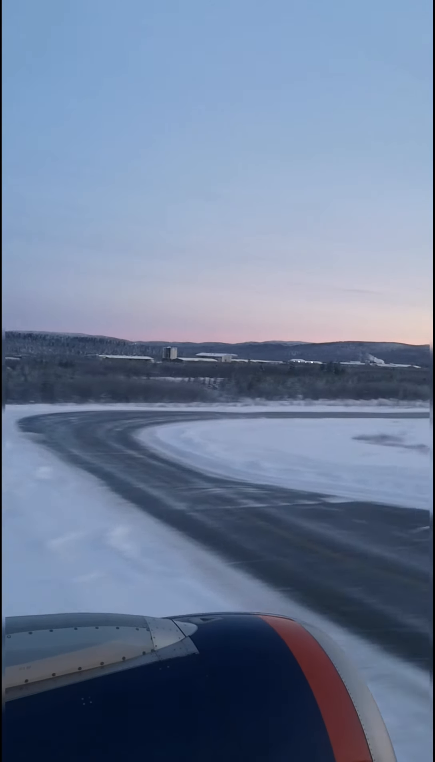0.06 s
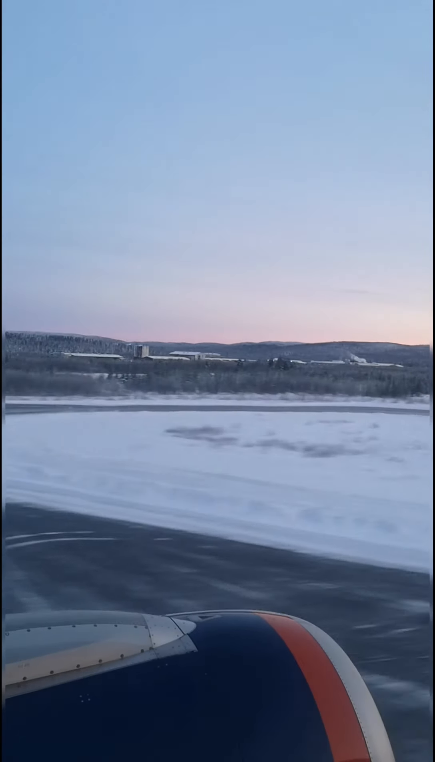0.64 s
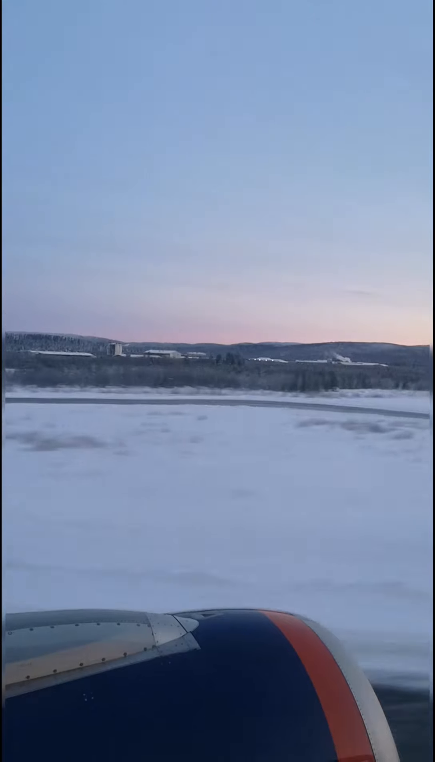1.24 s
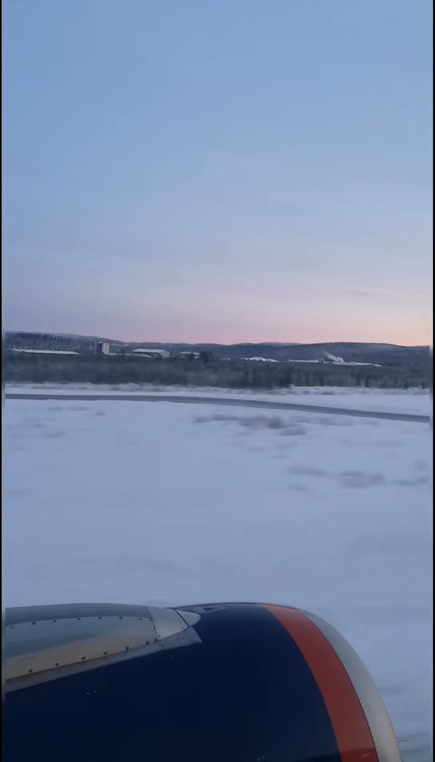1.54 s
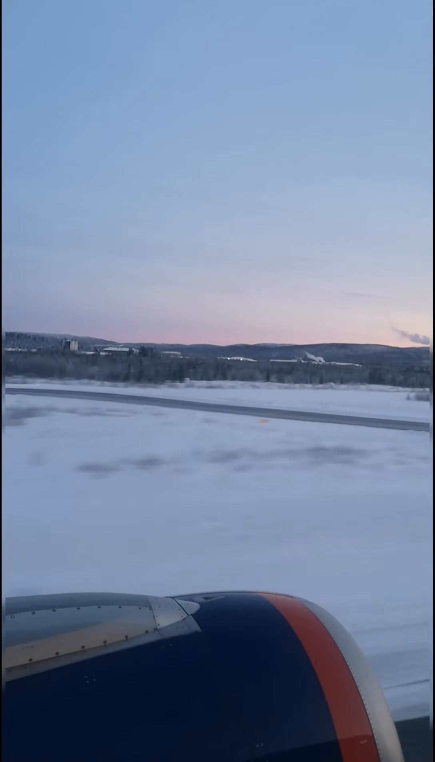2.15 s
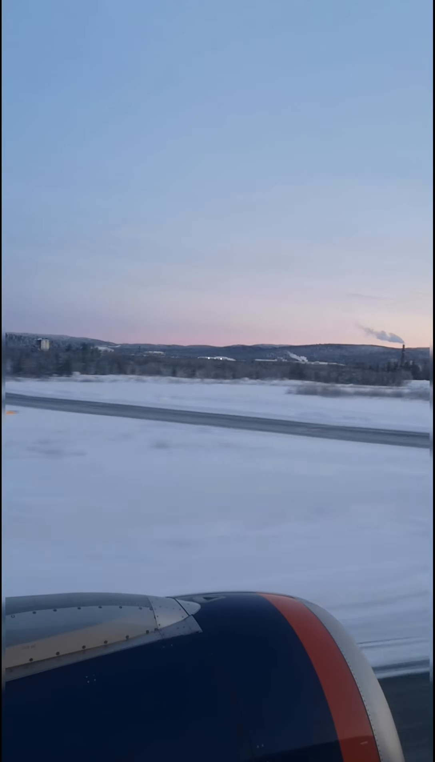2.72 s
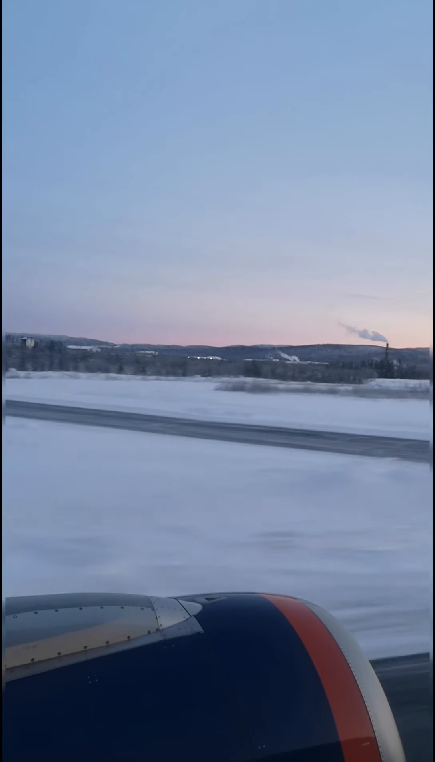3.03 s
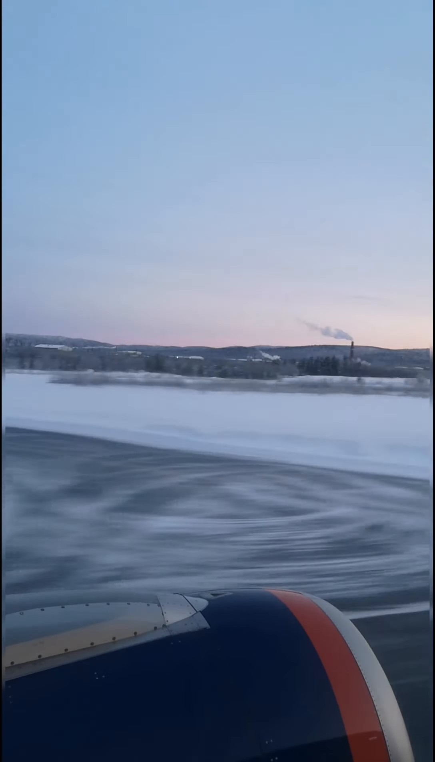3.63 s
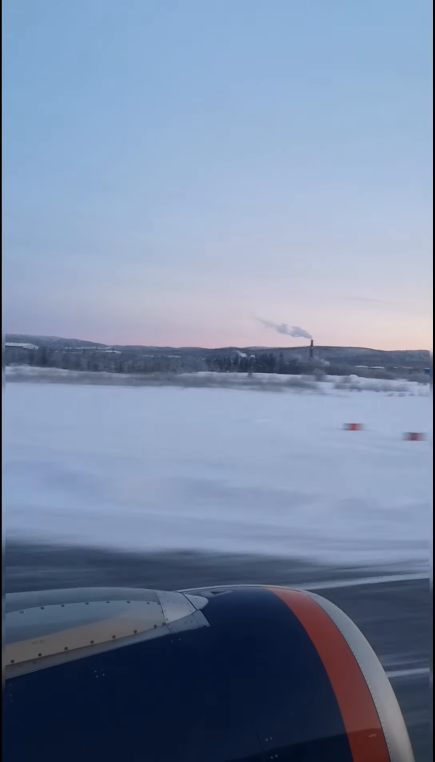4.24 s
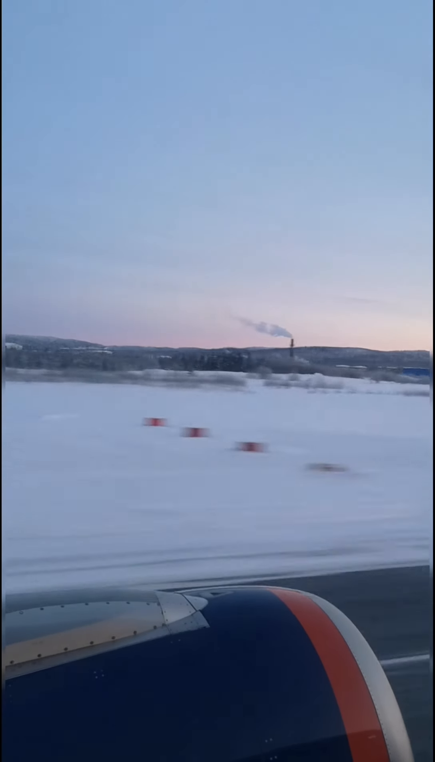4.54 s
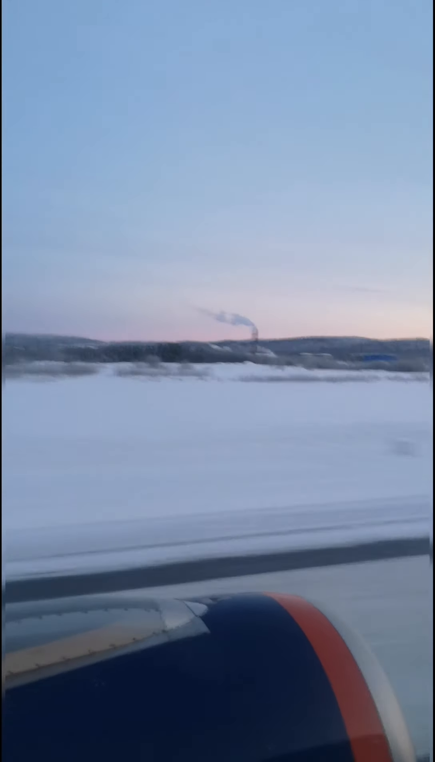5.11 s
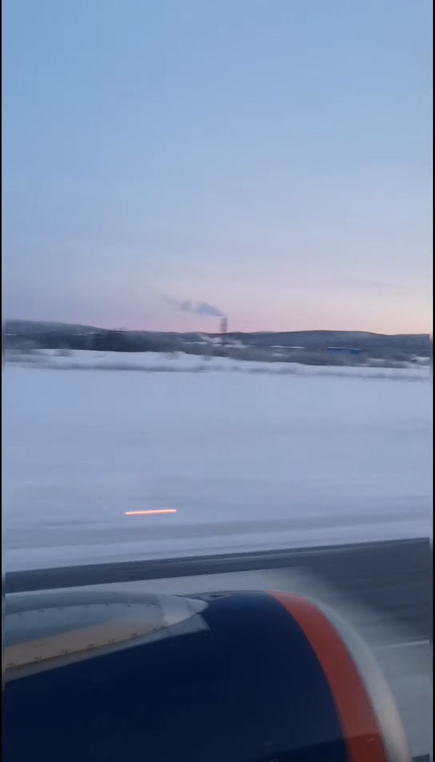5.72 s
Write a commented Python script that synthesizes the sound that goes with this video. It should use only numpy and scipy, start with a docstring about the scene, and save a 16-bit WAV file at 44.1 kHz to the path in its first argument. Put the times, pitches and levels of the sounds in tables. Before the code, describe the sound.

A jet engine drones inside a rolling airliner with rushing ventilation, then the wheels thud over rough ground and plastic trim rattles.

```python
"""Inside an airliner rolling on a winter airfield, stereo microphone at a window seat beside the engine.
The jet drones through the wall, its fan tone sinks as it spools down, and the ventilation rushes
and whines all around. After four seconds the wheels reach rough ground: the floor thuds, the plastic
trim ticks and rustles, and each heavy bump makes the recorder's gain control duck the whole cabin."""
import sys
import numpy as np
from scipy import signal
from scipy.fft import rfft, irfft, next_fast_len
from scipy.io import wavfile
from scipy.ndimage import uniform_filter1d, minimum_filter1d, map_coordinates

SR = 44100
rng = np.random.default_rng(int(sys.argv[2]) if len(sys.argv) > 2 else 0)


def store_wav(level_fs):
    """Save 16-bit WAV to argv[1]."""
    pcm = np.round(np.clip(np.atleast_2d(level_fs), -1, 1) * 32767)
    wavfile.write(sys.argv[1], SR, pcm.T.astype(np.int16))


N = 263277
TIME = np.arange(N) / SR


# The jet's drone through the wall, and the noise that comes with thrust.
# Each row: frequency in Hz, relative spectral level in dB.
DRONE_SPECTRUM = [(50, -25.5), (76, -3), (115, 1.5), (160, -0.5), (187, 1.5), (215, -11.5), (245, -11.5),
                  (295, -14.5), (340, -17), (410, -22), (480, -29), (560, -39.5), (2000, -130)]
THRUST_SPECTRUM = [(120, -42), (240, 1), (265, -3.5), (295, 1), (345, -8.5), (450, -19.5), (700, -46.5),
                   (2200, -38), (2700, -33), (3150, -44), (3800, -43), (12000, -100)]
# The fan's blade tone and its octave at the seat. Each row: time in seconds, level in dB.
BLADE_LEVELS = [(0, -37), (.6, -44.5), (1.0, -35), (1.45, -36), (1.7, -45), (2.8, -35), (3.15, -47),
                (3.3, -31.5), (3.7, -30.5), (3.88, -40), (4.1, -30), (4.4, -36.5), (4.8, -31.5), (5.3, -42),
                (5.65, -44.5), (5.85, -32.5)]
OCTAVE_LEVELS = [(0, -63.5), (1.8, -56.5), (2.05, -48), (2.5, -57.5), (3.0, -53), (3.5, -57), (3.7, -51),
                 (3.9, -55), (4.17, -44.5), (4.4, -51.5), (4.72, -52), (4.88, -64)]

def engine(throttle, taxi_hz=455, idle_hz=416):
    """Just beyond the wall, the jet's roar darkens and its blade tone sinks as the fan slows."""
    roar = amp(-18) * rush(DRONE_SPECTRUM, even=.65, span_s=.12)
    roar += amp(-33.5) * throttle * rush(THRUST_SPECTRUM, even=.51, span_s=.091)
    fan_hz = idle_hz + (taxi_hz - idle_hz) * throttle
    phase = 2 * np.pi * np.cumsum(fan_hz * (1 + .002 * wobble(25))) / SR
    stereo_phase = phase + np.array([[.2], [-.2]])
    blade = amp(curve(BLADE_LEVELS) + 1.3 * wobble(9)) * np.sin(stereo_phase)
    octave_db = curve(OCTAVE_LEVELS) + 1.5 * np.array([wobble(9), wobble(9)])
    return roar + blade + amp(octave_db) * np.sin(2 * phase)


def spool_down(start_s=2.75, length_s=2.85):
    """The throttle eases from 1 at taxi power to 0 at idle, quickly at first."""
    return np.clip(1 - (TIME - start_s) / length_s, 0, 1) ** 1.5


# The fuselage rumbling on smooth ground and juddering on rough.
# Each row: frequency in Hz, relative spectral level in dB.
ROLL_SPECTRUM = [(6, -23), (14, 1.5), (22, -3.5), (32, -3), (45, 8), (56, 1.5), (70, -8), (95, -5),
                 (125, -20.5), (200, -26.5), (400, -74.5), (1200, -140)]
JUDDER_SPECTRUM = [(6, -21), (14, -7), (22, -1), (32, -6), (44, 2.5), (54, 3.5), (68, -6), (85, -13),
                   (97, -12), (110, -21), (140, -27), (170, -23), (184, -19.5), (203, -38), (400, -70),
                   (1200, -140)]
# Bumps under the wheels, and two jolts that set the cabin booming.
# Each row: peak time in seconds, level in dB, decay in seconds.
WHEEL_BUMPS = [(.6, -12.5, .035), (.91, -8, 0.013), (1.25, -10, 0.019), (1.64, -15.5, .016),
               (2.03, -16, 0.055), (2.92, -13.5, .11), (3.5, -13.5, .047), (3.9, -12, .1), (4.34, -6, .05),
               (4.395, -5.5, 0.061), (4.82, -5.5, 0.08), (4.91, -6.5, 0.068), (5.07, -1, 0.13),
               (5.125, -1, 0.11), (5.26, -1, .08), (5.39, -5.5, .04), (5.43, -3.5, .035), (5.54, 3, 0.11),
               (5.645, -1.5, 0.065), (5.73, -4, .04), (5.81, -2.5, .04), (5.87, -4, 0.05)]
CABIN_BOOMS = [(4.76, -21, 0.22), (5.79, -16.5, 0.23)]

def wheels(smooth_db=-21, rough_db=-13, rough_from_s=4.13, onset_s=.18):
    """From below, the undercarriage shakes the fuselage; bumps also reach its hollow resonances."""
    rough = np.clip((TIME - rough_from_s) / onset_s, 0, 1)
    ground = amp(smooth_db + (rough_db - smooth_db) * rough + 3.5 * wobble(16))
    bumps = swells(WHEEL_BUMPS, rise_s=.022)
    roll = np.sqrt(1 - rough) * rush(ROLL_SPECTRUM, even=.91, span_s=.057)
    judder = np.sqrt(rough) * rush(JUDDER_SPECTRUM, even=.88, span_s=.038)
    booms = amp(-19) * bumps + swells(CABIN_BOOMS, rise_s=.068)
    hollow = booms * rush(DRONE_SPECTRUM, even=.6, span_s=.087)
    return np.hypot(ground, bumps) * (roll + judder) + hollow


# Landing gear jolts, under the microphone.
# Each row: peak time in seconds, level in dB, pitch in Hz, decay in seconds.
GEAR_JOLTS = [(4.42, -15, 78, .04), (4.85, -12, 102, .025), (4.945, -6.5, 97, .03),
              (5.035, -8.5, 100, 0.025), (5.09, -8.5, 72, .04), (5.18, -3, 95, .025), (5.23, -9, 104, .02),
              (5.275, -6, 84, 0.028), (5.305, -7, 101, .03), (5.67, -10.5, 80, 0.055),
              (5.86, -7.5, 88, .025)]

def floor_thuds():
    """Each sharp jolt rings the cabin floor for a few cycles."""
    wavering_time = np.cumsum(1 + .04 * wobble(40)) / SR
    out = np.zeros(N)
    for s, db, hz, decay_s in GEAR_JOLTS:
        phase = 2 * np.pi * hz * wavering_time + rng.uniform(0, 2 * np.pi)
        out += swells([(s, db, decay_s)], rise_s=.013) * np.sin(phase)
    return out


# Duct air all around the seat. Each row: frequency in Hz, relative spectral level in dB.
AIR_SPECTRUM = [(280, -25.5), (480, 7), (680, -.5), (800, 0), (1000, 4), (1170, -2), (1900, 0.5),
                (2270, -2), (2450, -3), (2700, -5.5), (3300, -12.5), (4100, -17.5), (4550, -16),
                (5000, -20), (5500, -20.5), (6300, -24.5), (7000, -21.5), (7800, -23), (8400, -27.5),
                (9150, -22), (9750, -29.5), (11500, -35.5), (15000, -45)]
# Ventilation fans and duct resonances.
# Each row: pitch in Hz, bandwidth in Hz, relative level in dB, side over mid in dB.
DUCT_WHINES = [(812, 36, -9.5, 9), (935, 70, -13, -9), (1060, 24, -13, 5), (1562, 18, -17.5, -1),
               (2009, 30, -10.5, -3), (2060, 130, -10.5, 2), (2545, 36, -14, -3), (2575, 130, -13, 3),
               (2985, 70, -24, 0), (3122, 50, -21.5, 2), (3489, 45, -27, -6), (3660, 80, -29, -12),
               (6900, 200, -35, 0)]

def ventilation(throttle, whine_idle_db=-47.25, taxi_boost_db=4.5):
    """Air rushes from the ducts; their fans' fuzzy whines weaken as the engine's air supply eases."""
    air = amp(-42.5 + .51 * wobble(14)) * rush(AIR_SPECTRUM, even=.26, span_s=.059)
    whines = np.zeros((2, N))
    for hz, width_hz, db, side_db in DUCT_WHINES:
        mid, side = ring(flutter(width_hz), hz) * amp([[0], [side_db]])
        whines += amp(db) * unit(np.array([mid + side, mid - side]))
    return air + amp(whine_idle_db + taxi_boost_db * throttle) * whines


# A panel's bright tick and dull knock. Each row: frequency in Hz, relative spectral level in dB.
TICK_SPECTRUM = [(500, -62), (3000, -22), (4500, -8.5), (5700, -3.5), (6700, -7), (7700, -2), (8700, -6),
                 (9600, -5), (11000, -19), (15000, -26.5)]
KNOCK_SPECTRUM = [(150, -45.5), (950, -1.5), (1400, -2), (2000, -5.5), (2700, -3), (3400, -13.5),
                  (8000, -36), (15000, -63)]
# Trim panels snapping in their seats. Each row: start in seconds, relative level in dB,
# knock over tick in dB, seconds to fall 60 dB, ring pitch in Hz, ring over knock in dB,
# tick pan and knock pan in dB to the right.
PANEL_SNAPS = [(4.796, -49.5, 19.5, .028, 1950, 0, 0.5, 2), (4.85, -46.5, -15, .014, 2000, 0, -3.5, 0),
               (4.865, -47, -15, .015, 2000, 0, 4.5, 0), (4.882, -50, -13, .03, 2000, 0, -2.5, 0),
               (4.905, -48.5, -10, .015, 2000, 0, 0.5, 0), (4.919, -45.5, -13, .044, 2000, 0, 0.5, 0),
               (5.021, -53, -6, 0.028, 2000, 0, -1, 0), (5.162, -29.5, -19, .01, 2000, 1, 5, 2),
               (5.201, -47.5, -12, .064, 2000, 0, -0.5, 0), (5.321, -38.5, -7, .025, 2000, 0, 1.5, 0),
               (5.493, -49.5, -2, .052, 2010, 0, 1.5, 2), (5.639, -46.5, 0, .076, 2020, 0, 1.5, 1),
               (5.735, -49, -3, .028, 2000, 1, 0, -1), (5.892, -36.5, 11.5, .044, 1040, -2, 4, -3.5),
               (5.907, -45, 4, .06, 1037, -1, 4, -1), (5.927, -42.5, 3, .1, 1104, -3, 3, -1)]

def panel_ticks():
    """A panel slips: a quick tick over the duller knock of its shell, which rings at its own pitch."""
    bright = diffuse(rng.standard_normal((2, N)), TICK_SPECTRUM)
    dull = diffuse(rng.standard_normal((2, N)), KNOCK_SPECTRUM)
    shell = flutter(width_hz=460)
    out = np.zeros((2, N))
    for s, db, knock_db, t60, ring_hz, ring_db, tick_pan, knock_pan in PANEL_SNAPS:
        age = np.maximum(TIME - s, 0)
        attack = 1 - np.exp(-age / (.071 * t60))  # longer slips start softer
        burst = attack * amp(db + 3 - 60 * age / t60)
        knock = dull + amp(ring_db) * ring(shell, ring_hz)
        out += burst * (bright * pan(tick_pan) + amp(knock_db) * knock * pan(knock_pan))
    return out


# Grains of chafing plastic, and soft swishes. Each row: frequency in Hz, relative spectral level in dB.
GRAIN_SPECTRUM = [(2000, -48), (4500, -0.5), (6000, -2.5), (9300, -1.5), (10500, -8), (12000, -15),
                  (15000, -20)]
SWISH_SPECTRUM = [(4000, -41.5), (7500, -4), (8600, -7.5), (9400, 2), (10200, -14), (11500, -32)]
# Loose trim chafing. Each row: peak time in seconds, relative level in dB, decay in seconds, pitch in Hz.
TRIM_CHAFES = [(4.81, -59.5, .18, 8400), (4.91, -58.5, .08, 5800), (4.94, -60, .12, 9500),
               (5.02, -62.5, .12, 8500), (5.14, -55, .16, 8000), (5.21, -56, .12, 6200),
               (5.28, -56.5, .2, 8000), (5.48, -61, .22, 7750), (5.66, -60, .4, 5400)]
# High swishes on the smooth ground. Each row: peak time in seconds, relative level in dB, decay in seconds.
SOFT_SWISHES = [(.5, -70, 0.044), (.8, -70, 0.056), (3.225, -61, .06)]

def trim_rustle(grains_per_s=4500, rise_s=.05):
    """Right of the microphone, shaken trim chafes in clumps of tiny grains, each part at its own pitch."""
    sizes = amp(1.4 * np.minimum(rng.exponential(size=N), 4))
    sizes *= rng.random(N) < grains_per_s / SR
    grains = diffuse(sizes * rng.standard_normal((2, N)), GRAIN_SPECTRUM)
    part = flutter(width_hz=900)
    strokes = [swells([row[:3]], rise_s) for row in TRIM_CHAFES]
    rings = sum(stroke * ring(part, hz) for stroke, (*_, hz) in zip(strokes, TRIM_CHAFES))
    clumps = amp(1.2 * wobble(70))
    chafing = (np.linalg.norm(strokes, axis=0) * grains + amp(-5) * rings) * clumps
    swish = swells(SOFT_SWISHES, rise_s) * diffuse(rng.standard_normal((2, N)), SWISH_SPECTRUM)
    return (chafing + swish) * amp([[-4], [2]])


# A strained panel rubbing in its frame. Each row: peak time in seconds, level in dB, decay in seconds.
PANEL_RUBS = [(4.77, -48, .03), (4.93, -50, .08), (5.0, -47, 0.046), (5.065, -45, .015)]

def panel_rub():
    """Friction drives one fuzzy resonance of a panel as the cabin flexes."""
    return swells(PANEL_RUBS, rise_s=.025) * ring(flutter(width_hz=130), hz=1000)


# Plastic edges squeaking. Each row: peak time in seconds, level in dB, half length in seconds,
# pitch in Hz, octave over fundamental in dB, pan in dB to the right.
EDGE_SQUEAKS = [(.48, -66, .02, 6350, -20, 2.5), (5.378, -63, .014, 10780, -30, 3),
                (5.837, -56, .021, 4850, -6, 3)]

def edge_squeaks():
    """Two plastic edges stick and slip for a moment: a tiny wavering tone and its octave."""
    wavering_time = np.cumsum(1 + .012 * wobble(160)) / SR
    out = np.zeros((2, N))
    for s, db, half_s, hz, octave_db, pan_db in EDGE_SQUEAKS:
        phase = 2 * np.pi * hz * wavering_time
        tone = np.sin(phase) + amp(octave_db) * np.sin(2 * phase)
        out += amp(db) * np.exp(-((TIME - s) / half_s) ** 2) * tone * pan(pan_db)
    return out * amp(2.6 * wobble(150))


# A small loose part buzzing. Each row: peak time in seconds, relative level in dB, decay in seconds.
PART_BUZZES = [(5.15, -61, .25), (5.5, -62, .25)]

def loose_buzz():
    """Left of the microphone, the judder shakes a loose part, which rings in one fuzzy resonance."""
    return swells(PART_BUZZES, rise_s=.05) * ring(flutter(width_hz=240), hz=3580) * pan(-6)


# The engine's core, faint at the seat. Each row: time in seconds, level in dB.
CORE_LEVELS = [(0, -62.5), (.7, -70.5), (1.3, -65.5), (2.5, -69.5), (3.3, -65.5), (3.8, -68), (4.15, -64),
               (4.9, -64), (5.3, -69)]

def core_whine(throttle, taxi_hz=3831, idle_hz=3814):
    """The engine's core gives a thin, unsteady whine that sinks a little as the fan spools down."""
    hz = idle_hz + (taxi_hz - idle_hz) * throttle + 4.5 * wobble(30)
    db = curve(CORE_LEVELS) + 2.5 * np.array([wobble(15), wobble(14)])
    return amp(db) * np.sin(2 * np.pi * np.cumsum(hz) / SR)


# The cabin's stereo width at the microphone. Each row: frequency in Hz, side over mid in dB.
CABIN_WIDTH = [(60, -35.5), (81, -16.5), (110, -22.5), (150, -18.5), (200, -11.5), (270, -11), (370, -5.5),
               (500, 5.5), (680, 10.5), (920, 2.5), (1240, -2), (1690, -0.5), (2280, 1), (3090, 0)]

def diffuse(x, spectrum):
    """Colour two unrelated signals into a cabin field, mid rms 1: bass centred, treble wide."""
    def response(hz):
        return amp(along(spectrum, hz)) * [np.ones_like(hz), amp(along(CABIN_WIDTH, hz))]
    mid, side = filtered(x, response)
    return np.array([mid + side, mid - side]) / np.std(mid)


def rush(spectrum, even, span_s):
    """Coloured cabin noise whose chance swells over span_s are evened out by the share even."""
    x = diffuse(rng.standard_normal((2, N)), spectrum)
    power = running_power(x, span_s)
    return x / (power / power.mean() + 1e-6) ** (even / 2)


def swells(rows, rise_s):
    """Joint envelope of (peak time s, dB, decay s) events that rise quickly and die away."""
    each = [amp(db) * np.exp(-np.where(TIME < s, ((TIME - s) / rise_s) ** 2, (TIME - s) / decay_s))
            for s, db, decay_s in rows]
    return np.linalg.norm(each, axis=0)


def flutter(width_hz):
    """The wandering strength and phase of a noise-driven resonance, in two channels."""
    return np.array([wobble(width_hz) + 1j * wobble(width_hz) for _ in range(2)])


def ring(drive, hz):
    """Sound a flutter as a fuzzy tone around hz."""
    return np.real(drive * np.exp(2j * np.pi * hz * TIME))


def wobble(rate):
    """A smooth random curve of rms 1, rate knots a second."""
    knots = rng.standard_normal(int(N * rate / SR) + 4)
    return unit(map_coordinates(knots, [TIME * rate]))


def amp(db):
    """Decibels to gain."""
    return 10 ** (np.asarray(db) / 20)


def pan(db):
    """Stereo gains: the left lowered and the right raised by db."""
    return amp([[-db], [db]])


def unit(x):
    """Scale to rms 1."""
    return x / np.sqrt(np.mean(x ** 2) + 1e-20)


def along(points, hz):
    """(Hz, value) points read on a log axis."""
    freqs, values = np.transpose(points)
    return np.interp(np.log(hz + 1), np.log(freqs + 1), values)


def curve(points):
    """(seconds, value) points read at every sample."""
    return np.interp(TIME, *np.transpose(points))


def filtered(x, response):
    """Shape x by a gain that depends on frequency."""
    size = next_fast_len(N + SR // 2)
    return irfft(rfft(x, size) * response(np.fft.rfftfreq(size, 1 / SR)), size)[..., :N]


def running_power(x, span_s):
    """Power of both channels, averaged over span_s."""
    return np.abs(uniform_filter1d(np.mean(x ** 2, 0), int(span_s * SR) + 1))


def gain_control(x, threshold_db=-10.5, squeeze=.67, attack_s=.0073, recover_db_per_s=27.5):
    """The recorder quickly takes away a share of any level over the threshold, then recovers slowly."""
    level_db = 10 * np.log10(running_power(x, span_s=.022) + 1e-12)
    excess_db = np.maximum(level_db - threshold_db, 0)
    recovery_db = recover_db_per_s * TIME
    cut_db = np.maximum.accumulate(squeeze * excess_db + recovery_db) - recovery_db
    lag = np.exp(-1 / (attack_s * SR))
    return x * amp(-signal.lfilter([1 - lag], [1, -lag], cut_db))


def scene():
    """All that reaches the microphone at the window seat."""
    throttle = spool_down()
    jet = engine(throttle) + core_whine(throttle)
    trim = trim_rustle() + panel_ticks() + panel_rub() + edge_squeaks() + loose_buzz()
    return wheels() + jet + ventilation(throttle) + trim + floor_thuds()


def record(dry, ceiling=.94, fade_in_s=.006, top_hz=15100):
    """Gain control ducks under the rumble, a limiter holds the heaviest jolts, and the top is cut off."""
    ducked = gain_control(dry)
    needed_gain = np.minimum(1, ceiling / (np.abs(ducked).max(0) + 1e-9))
    limiter_gain = uniform_filter1d(minimum_filter1d(needed_gain, size=700), size=700)
    fade = np.minimum(1, TIME / fade_in_s)
    return filtered(ducked * limiter_gain * fade, lambda hz: hz < top_hz)


dry = scene()
out = record(dry)
store_wav(out)
```